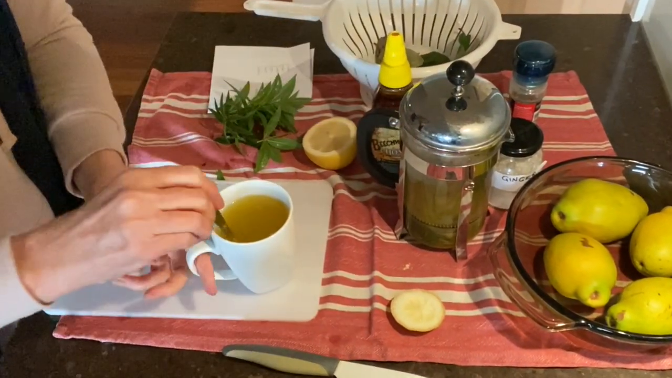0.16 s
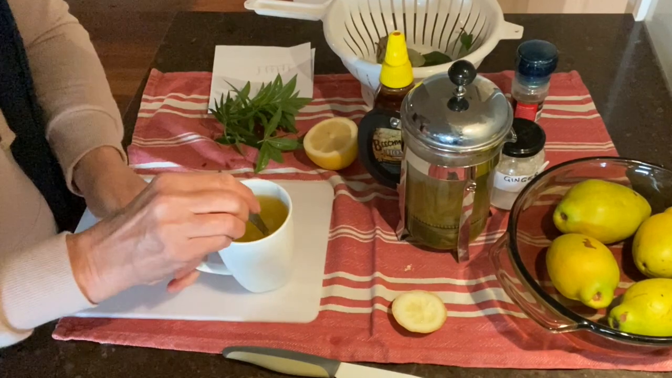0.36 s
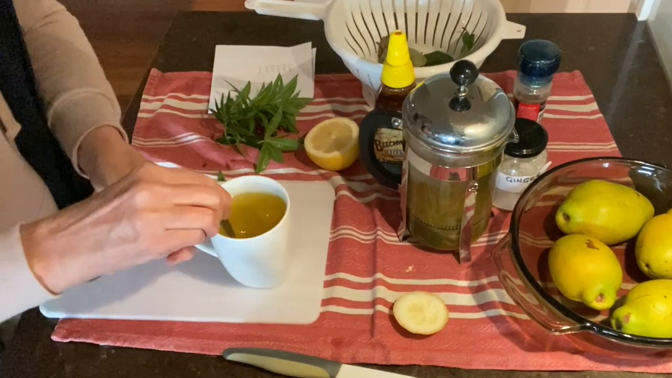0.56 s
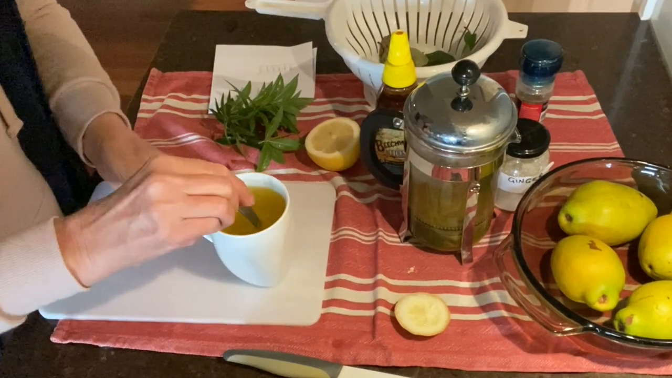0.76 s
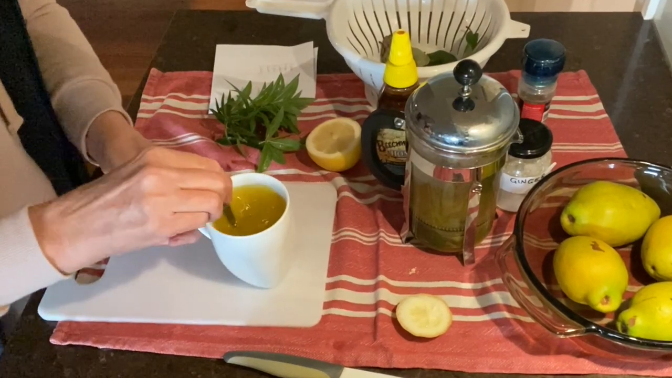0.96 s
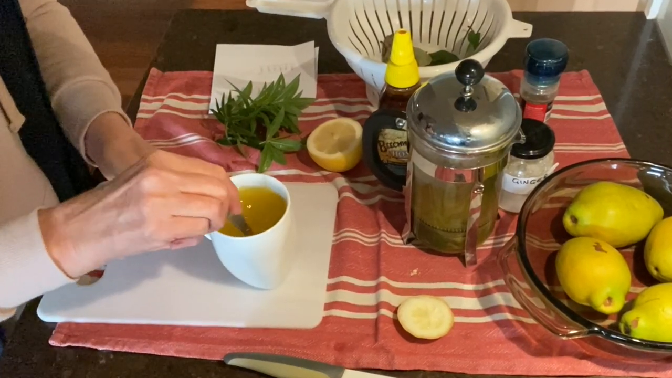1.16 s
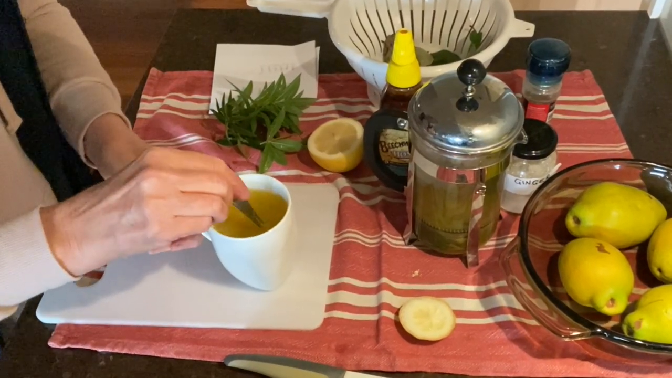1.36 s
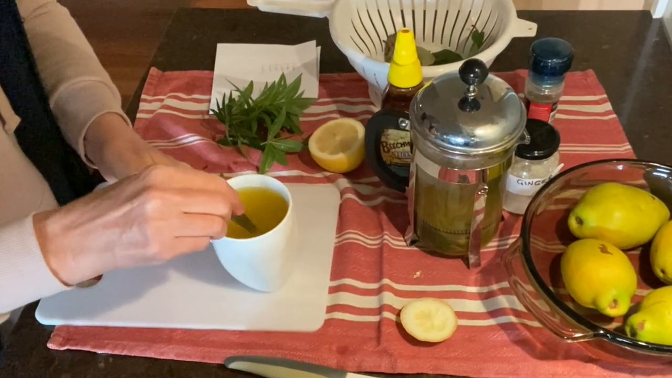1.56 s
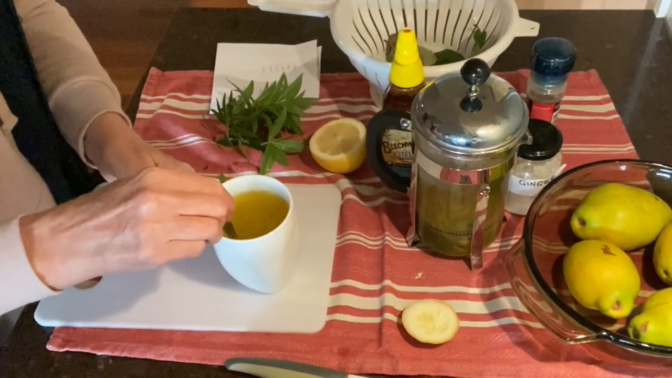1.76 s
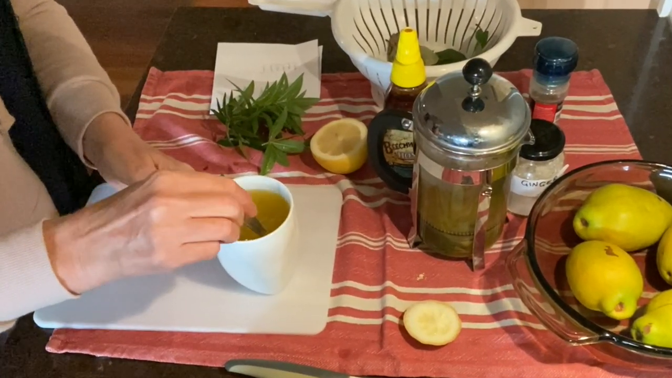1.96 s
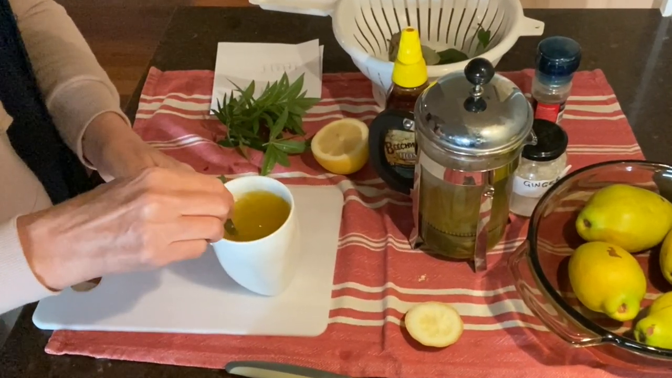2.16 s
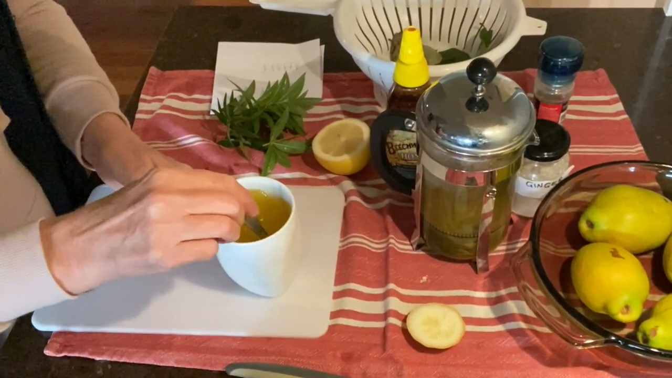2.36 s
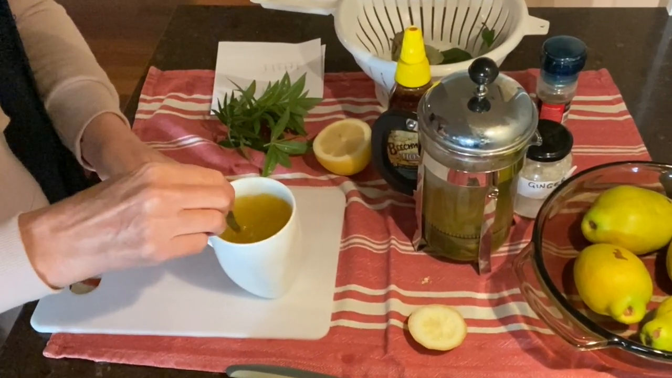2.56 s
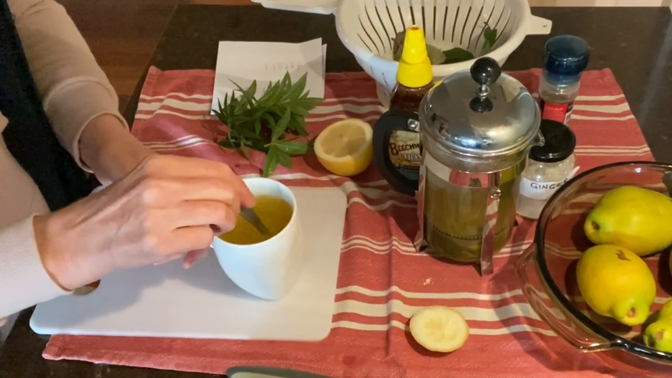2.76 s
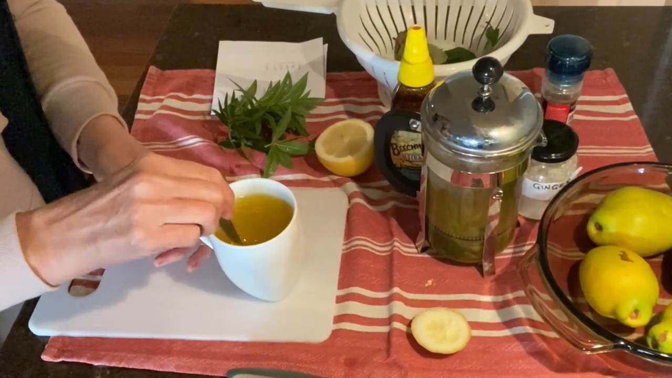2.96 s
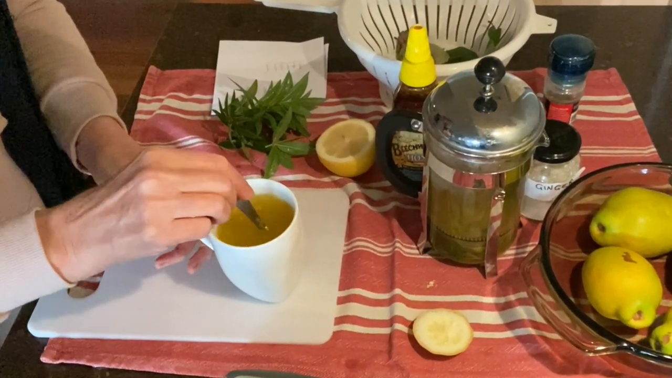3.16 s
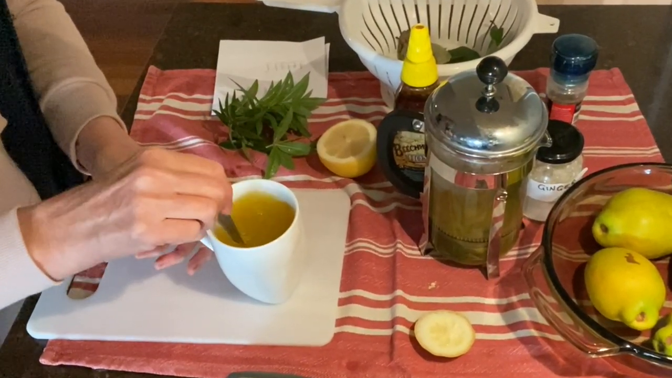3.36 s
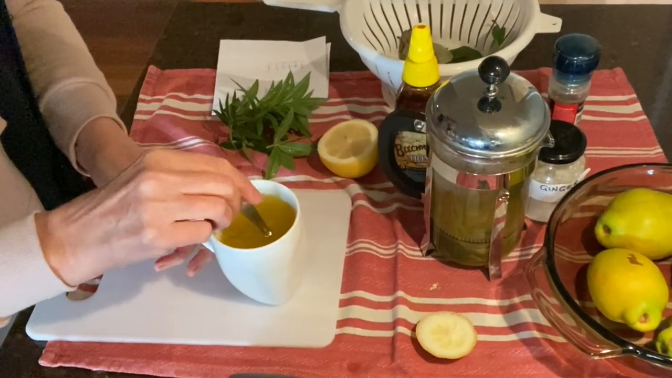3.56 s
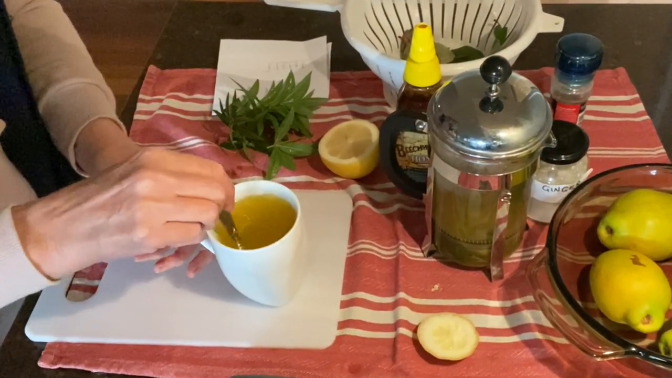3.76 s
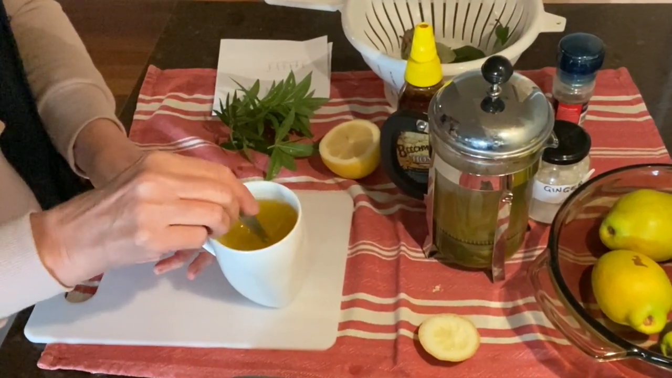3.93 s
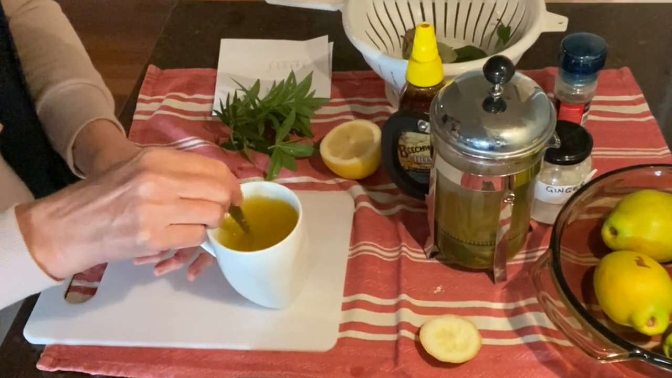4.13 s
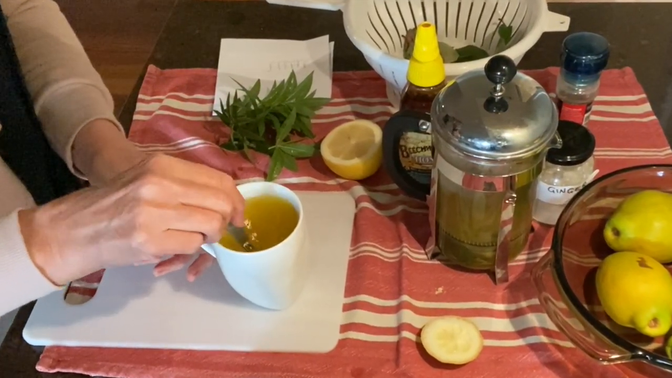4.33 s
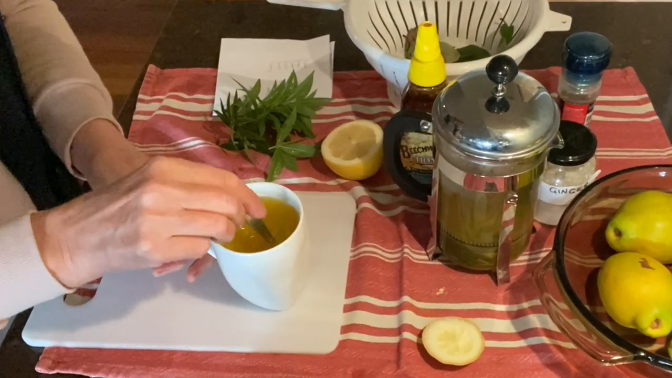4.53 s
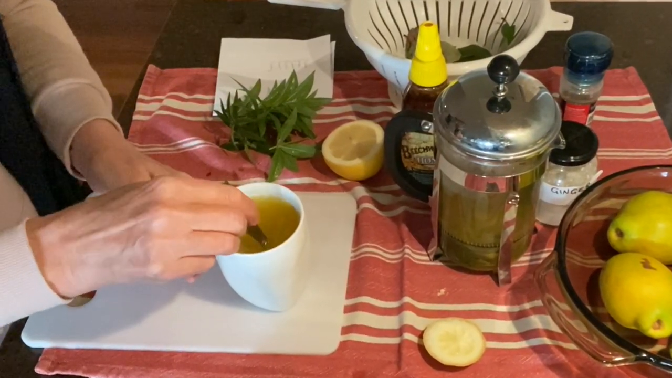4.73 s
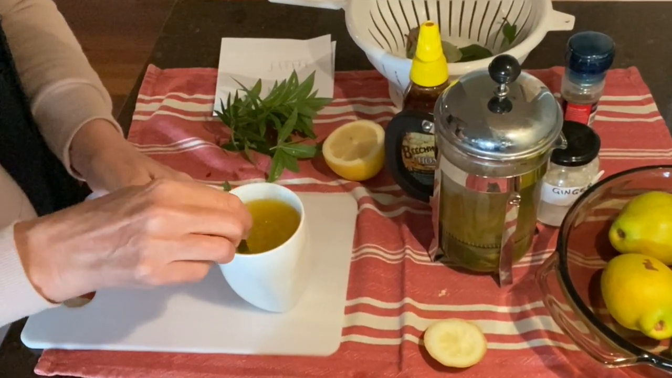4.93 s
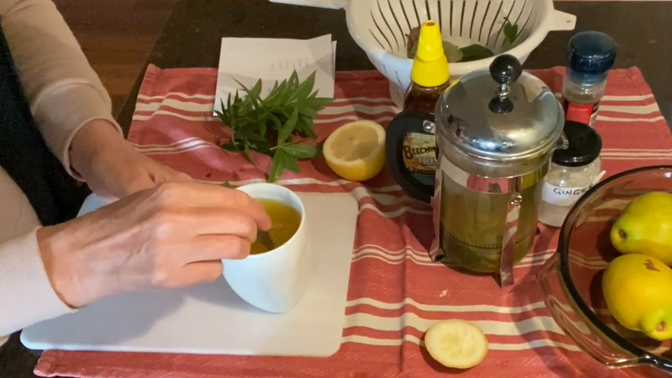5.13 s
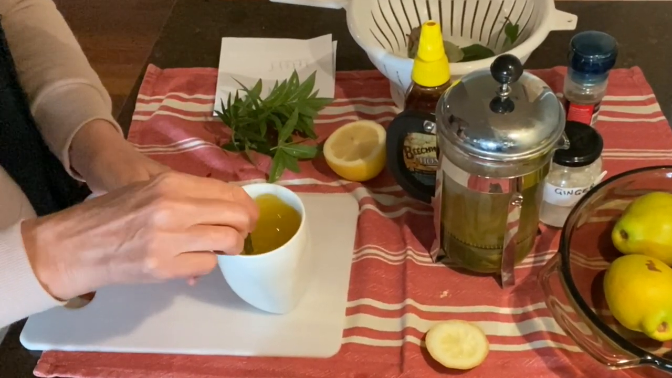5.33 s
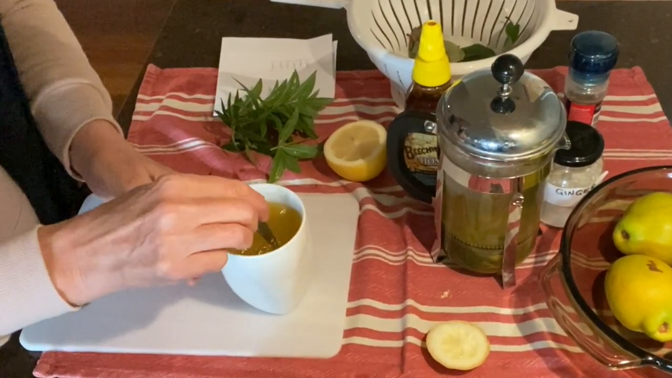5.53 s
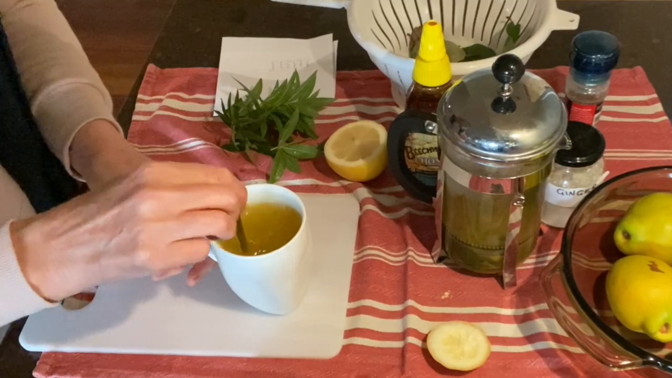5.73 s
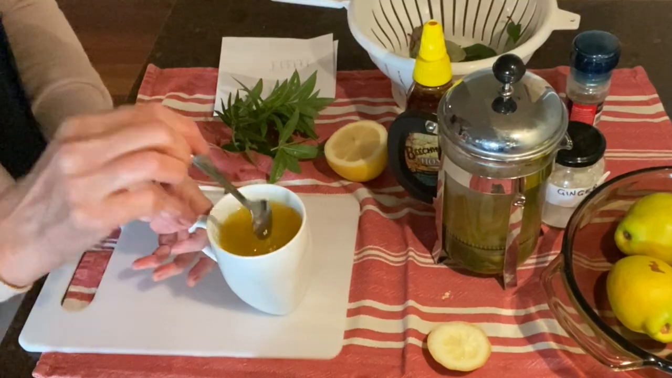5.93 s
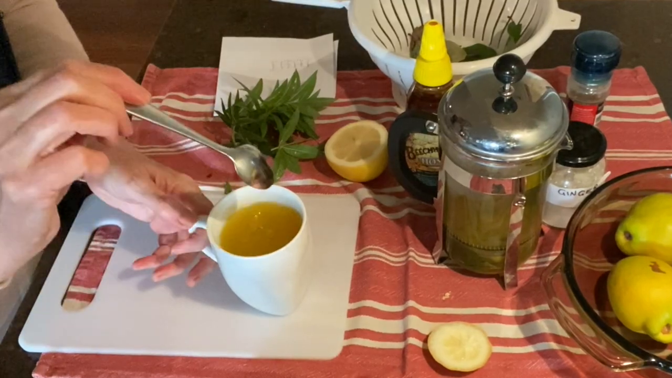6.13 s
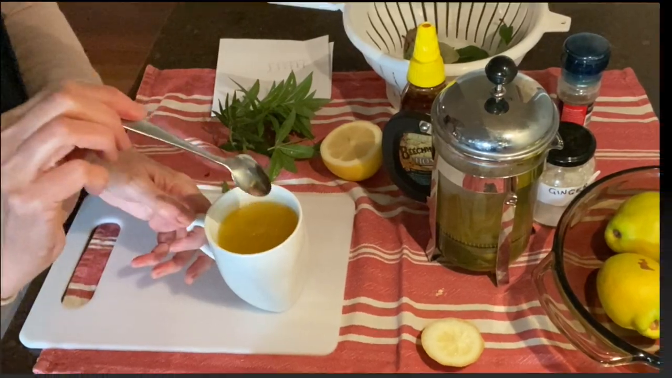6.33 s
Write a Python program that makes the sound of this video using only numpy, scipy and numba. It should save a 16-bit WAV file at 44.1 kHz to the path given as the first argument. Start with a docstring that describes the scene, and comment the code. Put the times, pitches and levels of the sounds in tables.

```python
"""A steel spoon clinks and scrapes in a ceramic cup of hot drink on a plastic board in a quiet kitchen.
Knocks and drags ring decaying modes of cup and spoon; touching damps the ring, and low thuds come from the board.
The stirred drink swishes as resonant noise; plops and drips are short, nearly steady tones with a noise splash.
Direct sound sits slightly right of centre, over a short room tail, low hum and stereo room noise."""
import sys
import numpy as np
from scipy import signal
from scipy.io import wavfile
from numba import njit

SR = 44100
rng = np.random.default_rng(int(sys.argv[2]) if len(sys.argv) > 2 else 0)


def unload_audio(sound):
    """Save the sound as a 16-bit wav file, at the path given as the first command line argument."""
    columns = np.transpose(np.atleast_2d(sound))
    # keep every value between -1 and 1, then stretch to whole-number steps
    steps = np.round(np.clip(columns, -1, 1) * 32767)
    wavfile.write(sys.argv[1], SR, steps.astype(np.int16))


N = 286120

# Spoon knocks on the cup; the levels drive the contacts, before mode and family weights:
# (t/s, strength level/dB, rim ring level/dB, place round the rim from the handle/deg,
#  dull knock level/dB, favoured dull f/Hz, favoured clink f/Hz)
SPOON_KNOCKS = [(0.171, -17, -30, 2.7, -74.5, 2210, 7160), (0.266, -15, -34, 28, -47, 2320, 7430),
                (0.4, -21, -44, 2.2, -71, 2290, 7370), (0.431, -31, -44.5, 30, -32.5, 2260, 5150),
                (0.6053, -20, -57, 12, -33.5, 2170, 8240), (0.79, -19.5, -50, 2, -31.5, 2110, 5580),
                (0.8084, -25.5, -50, 11, -34, 2414, 7190), (0.8401, -23.5, -57, 32, -38, 2050, 7450),
                (0.8997, -19.5, -45.5, 74, -23, 2200, 7770), (0.9881, -29, -50.5, 28, -78, 1850, 6830),
                (1.104, -26.5, -47.5, 21, -24.5, 2090, 7980), (1.1907, -20, -38, 29, -27, 1960, 7670),
                (1.207, -29, -55.5, 16, -27.5, 1880, 7300), (1.3421, -9, -53.5, 15, -20, 2160, 5830),
                (1.442, -28, -45, 37, -32, 2140, 7700), (1.501, -17.5, -35.5, 44, -25.5, 1240, 5550),
                (1.8056, -32, -57, 28, -42, 1705, 8840), (1.97, -18.5, -40, 9.5, -29, 2373, 4180),
                (2.0072, -23.5, -31.5, 2, -50.5, 2020, 7960), (2.0333, -17.5, -34, 89, -29, 1500, 8150),
                (2.231, -33, -54.5, 40, -76.5, 1720, 8200), (2.386, -13.5, -23, 10, -27, 1500, 6910),
                (2.4175, -23.5, -34.5, 8, -50.5, 1300, 8300), (2.4443, -15.5, -44.5, 34, -22, 1610, 3560),
                (2.8138, -20.5, -62.5, 39, -45, 1450, 5600), (2.8271, -17, -35, 18.5, -49.5, 2480, 6940),
                (2.842, -27, -38.5, 29, -44, 2450, 7500), (2.883, -27, -42, 25, -50.5, 1480, 7150),
                (2.9743, -28, -43.5, 2, -53.5, 1520, 7630), (3.037, -24.5, -48, 19, -46.5, 1740, 6800),
                (3.26, -29, -46.5, 23, -51, 1860, 7970), (3.272, -34, -48.5, 37, -40, 1837, 7670),
                (3.3347, -21, -43, 44, -34.5, 1480, 8130), (3.6689, -14.5, -36.5, 3, -17.5, 1270, 5300),
                (3.9716, -27.5, -81, 18, -57, 1490, 7650), (3.989, -17.5, -42.5, 58, -30.5, 2320, 7130),
                (4.0195, -28, -39, 2, -34.5, 1480, 5770), (4.2873, -33, -59.5, 31, -54.5, 1500, 7660),
                (4.3067, -20, -40, 6.9, -24, 1647, 7270), (4.3365, -23, -76, 6, -28, 1260, 5900),
                (4.598, -27.5, -51.5, 16, -71, 1880, 3650), (4.6331, -18.5, -32, 40, -26, 2110, 7120),
                (4.971, -32, -53, 9.3, -53.5, 1830, 5620), (5.1066, -9.5, -33.5, 5.8, -36, 2500, 3890),
                (5.1351, -20, -38, 60, -30.5, 1500, 7220), (5.283, -37.5, -46.5, 50, -35.5, 2060, 7300),
                (5.487, -15, -25.5, 27, -54, 2056, 7300), (5.5183, -11.5, -29, 32, -30, 1916, 8170),
                (5.75, -64, -47.5, 44, -63, 2030, 7300)]


def amp(db):
    """Amplitude factor of a level in dB."""
    return 10 ** (np.asarray(db) / 20)


def rms_one(x):
    """Scale a signal to an rms of 1."""
    return x / np.sqrt(np.mean(x ** 2) + 1e-20)


def band(x, low_hz, high_hz):
    """Band-pass between two corner frequencies."""
    sos = signal.butter(2, [low_hz, high_hz], "band", fs=SR, output="sos")
    return signal.sosfilt(sos, x + 1e-18)


def at_hz(points, hz):
    """Read a curve of (f/Hz, value) points, straight over log frequency."""
    point_hz, values = np.transpose(points)
    return np.interp(np.log(hz), np.log(point_hz), values)


def drift(rate):
    """Slow random wander with an rms of 1, faster for a higher rate."""
    step = 40   # samples between computed points
    r = np.exp(-2 * step * np.pi * rate / SR)
    noise = rng.standard_normal(N // step + 2002)
    slow = signal.lfilter([1], [1, -2 * r, r * r], noise)[2000:]   # drop the filter's start
    return np.interp(np.arange(N) / step, np.arange(len(slow)), rms_one(slow))


@njit
def ring(force, turn, keep):
    """One mode: a phasor that turns and shrinks by the given amounts at each sample."""
    out, z = np.zeros(len(force)), 0j
    for i in range(len(force)):
        z = z * keep[i] * np.exp(1j * turn[i]) + force[i]
        out[i] = z.imag
    return out


def blows(level_db, rattle_s, hz):
    """Each knock is a short dying noise rattle of the contact; a nonzero hz evens out its strength there."""
    contact_rise_s = 0.00041
    out, t = np.zeros(N), np.arange(SR // 25) / SR
    noise = rng.standard_normal((len(SPOON_KNOCKS), len(t)))
    rattle = noise * np.exp(-t / rattle_s) / np.sqrt(rattle_s * SR)
    rattle *= 1 - np.exp(-t / contact_rise_s)
    if hz:
        strength_at_hz = np.abs(rattle @ np.exp(2j * np.pi * hz * t))
        rattle /= np.maximum(strength_at_hz, .22)[:, None]   # the floor limits the boost
    for knock, gain, shape in zip(SPOON_KNOCKS, amp(level_db), rattle):
        at = round(knock[0] * SR)
        out[at:at + len(t)] += gain * shape
    return out


def strokes():
    """The spoon drags along the wall and pushes the drink: each rub swells and fades as its swish pitch rises."""
    # Rubs: (start t/s, length/s, drag swell level/dB, swish swell level/dB, swish f at the start/Hz)
    rubs = [(0.257, 0.72, -73.5, -54.5, 750), (0.942, 0.43, -69, -59.5, 1793),
            (1.324, 0.18, -66.5, -58.5, 1920), (1.6, 0.18, -78, -58.5, 1970),
            (2.001, 0.28, -66.5, -57.5, 1820), (2.5, 0.15, -71.5, -51.5, 1575),
            (2.555, 0.045, -63, -63, 3070), (2.834, 0.54, -67.5, -70, 1696),
            (3.324, 0.43, -70.5, -65.5, 1585), (3.441, 0.043, -48, -58, 1750),
            (3.721, 0.34, -64.5, -82, 1358), (4.016, 0.25, -60.5, -63, 1806),
            (4.352, 0.24, -63.5, -63.5, 2254), (4.799, 0.077, -70.5, -56.5, 3077),
            (4.9, 0.084, -82.5, -65, 2006), (5.147, 0.38, -66.5, -68.5, 1703),
            (5.6, 0.15, -60.5, -52, 1593)]
    swish_rise = 0.4     # relative rise of pitch over a rub
    swell_early = 0.53   # under 1 the drag peaks early
    drag, swish, pitch = np.zeros(N), np.zeros(N), np.full(N, float(rubs[0][4]))
    for s, length, drag_db, swish_db, swish_hz in rubs:
        span = slice(round(s * SR), round((s + length) * SR))
        way = np.linspace(0, 1, span.stop - span.start)
        drag[span] += amp(drag_db) * np.sin(np.pi * way ** swell_early)
        swish[span] += amp(swish_db) * np.sin(np.pi * way)
        pitch[span] = swish_hz * (1 + swish_rise * way)
    return drag, swish, pitch


def cup_and_spoon(pressure):
    """Knocks and drag drive all modes; each knock stops part of the old ring, and dragging damps it."""
    # Modes of cup and spoon by family, before the shared pitch sway and the damping by touch:
    # (f/Hz, level/dB, t60/s)
    wall_modes = [(7170, -9, 0.027), (7484, -14, 0.12), (7665, -9.5, 0.045), (8595, -2, 0.011),
                  (10327, -4, 0.028), (9380, -10, 0.027)]
    dull_modes = [(1245, -11.5, 0.073), (1491, -3, 0.04), (1845, 2, 0.034), (2050, -3.5, 0.032),
                  (2525, 12, 0.03)]
    spoon_modes = [(3606, -1, 0.013), (3950, 2, 0.013), (4312, -3.5, 0.025), (5197, 1, 0.018),
                   (6196, 1.3, 0.032)]
    # The two rim tones: (f/Hz, level/dB, t60/s), likewise before sway and touch
    rim_modes = [(2561.2, 0.0037, 0.44), (2753, 0.0048, .32)]
    # The drink climbing the wall loads the cup; course of the lower rim tone before its wander: (t/s, f/Hz)
    rim_pitch = [(.3, 2605), (.5, 2565)]
    clink_db, wall_db = -7, 4   # spoon clink and cup wall, from the strength of the knock
    drag_damping = 5800         # ring lost per second and unit of drag
    # modes away from the favoured pitch sound weaker, up to a limit
    favour_db_per_octave, favour_most_db = 90.0, 18.0

    s, strength, rim, place, dull, dull_hz, clink_hz = np.transpose(SPOON_KNOCKS)
    # the two rim tones bend the cup along crossed axes: the place struck shares the ring between them
    angle = 2 * np.radians(place)
    rim_low = rim + 20 * np.log10(np.abs(np.cos(angle)) + 1e-3)
    rim_high = rim + 20 * np.log10(np.abs(np.sin(angle)) + 1e-3)

    uneven_contact = amp(6.0 * drift(20))
    touch = np.exp(-drag_damping * pressure * uneven_contact / SR)
    touch[np.round(s * SR).astype(int)] = .3   # share of the old ring that a knock leaves

    # dragging over the glaze: dense uneven slips
    slip_db = 3.0 * rng.exponential(1, N) + 6.5 * drift(18)
    drag = pressure * rms_one(rng.standard_normal(N) * amp(slip_db))
    hiss = band(drag, 1200, 12000)
    crack = blows(strength + 6, 0.017, 0)
    out = band(crack + hiss, 2700, 20000)   # broad noise of the contact

    course_hz = np.interp(np.arange(N) / SR, *np.transpose(rim_pitch))
    sway = course_hz / rim_modes[0][0] + .0025 * drift(14)
    # (modes, level of each knock/dB, favoured f/Hz, share of the drag/dB)
    families = [(rim_modes[:1], rim_low, None, -26),
                (rim_modes[1:], rim_high, None, -28),
                (wall_modes, strength + wall_db, clink_hz, -12),
                (dull_modes, dull, dull_hz, -34),
                (spoon_modes, strength + clink_db, clink_hz, -18)]
    for modes, knock_db, favoured_hz, drag_share_db in families:
        for hz, level_db, t60 in modes:
            # the spot struck favours some modes; a lone rim tone gets no scatter
            spot_db = rng.normal(0, 2.0 * (len(modes) > 1), len(s))
            if favoured_hz is not None:
                octaves_off = np.abs(np.log2(hz / favoured_hz))
                spot_db -= np.minimum(favour_db_per_octave * octaves_off, favour_most_db)
            force = blows(knock_db + spot_db, 0.0034, hz)
            force += amp(drag_share_db + 7.2 * drift(18.4)) * drag
            turn = 2 * np.pi * hz * sway / SR
            keep = touch * amp(-60 / (t60 * SR))
            out = out + ring(amp(level_db) * force, turn, keep)
    return band(out, 450, 18000)


def board():
    """The cup rocks on the board: band-passed low rattles thud along with the dull knocks."""
    dull_db = np.array(SPOON_KNOCKS)[:, 4]
    thud = blows(dull_db + 8, 0.025, 0)
    return band(thud, 110, 320)


def drink(strength, pitch):
    """Noise swishes in a wandering resonance over a wash; bubbles and drips are short tones with a splash."""
    # Bubbles and drips, level before the quick rise and decay: (t/s, level/dB, f at the start/Hz)
    plops = [(1.717, -42.5, 2425), (1.913, -45.5, 1935), (4.857, -38.5, 1947), (6.358, -38, 1790)]
    flow = rng.standard_normal(N) * amp(6.0 * drift(30))
    turn = 2 * np.pi * pitch * np.exp(0.05 * drift(12)) / SR
    width_hz = 120.0 * (2000 / pitch) ** 2   # the lower, the broader
    swish = ring(flow, turn, np.exp(-np.pi * width_hz / SR))
    wash = band(rng.standard_normal(N), 680, 3400)
    out = strength * (rms_one(swish) + amp(-13.5) * rms_one(wash))
    t = np.arange(SR // 10) / SR
    for s, level_db, hz in plops:
        shape = (1 - np.exp(-t / 0.0006)) * np.exp(-t / .0065)
        tone = np.sin(2 * np.pi * hz * t * (1 + .3 * t)) * shape   # nearly steady while it sounds
        splash = 0.13 * rng.standard_normal(len(t)) * np.exp(-t / 0.00062)
        at = round(s * SR)
        out[at:at + len(t)] += amp(level_db) * (tone + splash)
    return out


def kitchen(x, t60):
    """The room answers with a dying stereo noise tail, whose treble dies sooner."""
    t = np.arange(int(.5 * SR)) / SR
    low, high = rng.standard_normal((2, 2, len(t)))
    low_tail = band(low, 150, 4000) * amp(-60 * t / t60)
    high_tail = .6 * band(high, 4000, 15000) * amp(-60 * t / (.7 * t60))
    mid, side = low_tail + high_tail
    tail = 1.48 * mid + side * [[1], [-1]]
    tail = tail / np.sqrt(np.sum(tail ** 2) / 2)
    return signal.fftconvolve(x[None], tail, axes=1)[:, :N]


def background():
    """Half-octave bands of stereo noise make the room noise, and narrow bands of noise the hum."""
    # Spectrum of the room noise, relative: (f/Hz, level per Hz/dB)
    room_noise = [(30, -26), (60, -4.5), (130, -28.5), (200, -23.5), (700, -32.5), (13000, -49.5)]
    # Likeness of left and right: (f/Hz, likeness from 0 to 1)
    likeness = [(70, 0.36), (500, 0.069)]
    # Wavering low tones: (f/Hz, width/Hz, rms level/dB)
    hum_tones = [(59.8, 16, -59), (108, 33, -67)]
    room_noise_db = -66   # rms over both channels
    out, edges = 0, 25 * 2 ** np.arange(0, 9.6, .5)
    white = rng.standard_normal((2, 2, N))
    for k, (low, high) in enumerate(zip(edges, edges[1:])):
        mid, side = band(white[k % 2], low, high)   # neighbouring bands use different noise
        hz = np.sqrt(low * high)
        alike = np.clip(at_hz(likeness, hz), 0, 1)
        stereo = np.sqrt(1 + alike) * mid + np.sqrt(1 - alike) * side * [[1], [-1]]
        out = out + amp(at_hz(room_noise, hz)) * stereo
    hum = np.zeros(N)
    for hz, width_hz, level_db in hum_tones:
        tone = band(rng.standard_normal(N), hz - width_hz / 2, hz + width_hz / 2)
        hum += amp(level_db) * rms_one(tone)
    return amp(room_noise_db) * rms_one(out) + hum


def scene():
    """The cup, the drink and the board, slightly right of centre, with their room tails and the background."""
    drag, swish, pitch = strokes()
    cup = cup_and_spoon(drag)
    soft = drink(swish, pitch) + board()
    direct = (cup + soft) * amp([[-.4], [.4]])   # left, right
    room = amp(-12) * kitchen(cup, 0.3)
    room = room + amp(-6.5) * kitchen(soft, 0.27)
    return direct + room + background()


def record(dry):
    """At the microphone the deepest bass is weak and the top is cut steeply."""
    cutoff_hz = 16500   # from here up at least 70 dB down
    thin = signal.sosfilt(signal.butter(2, 45, "high", fs=SR, output="sos"), dry)
    return signal.sosfilt(signal.cheby2(12, 70, cutoff_hz, fs=SR, output="sos"), thin)


dry = scene()
out = record(dry)
unload_audio(out)
```